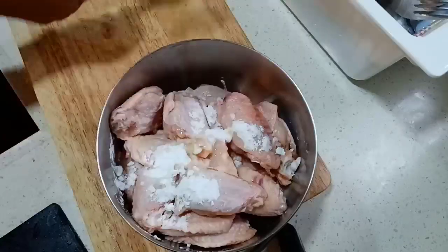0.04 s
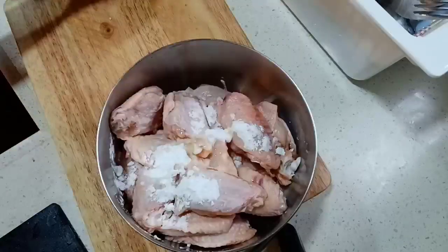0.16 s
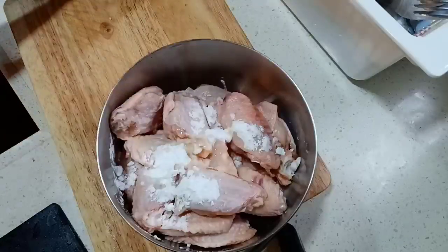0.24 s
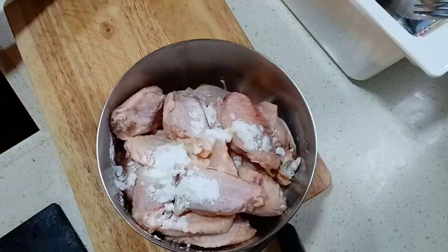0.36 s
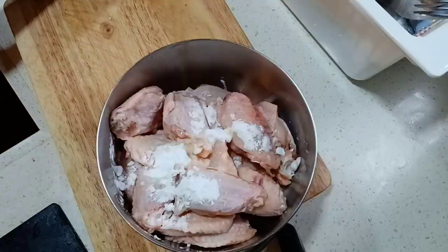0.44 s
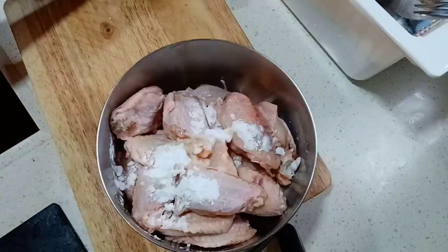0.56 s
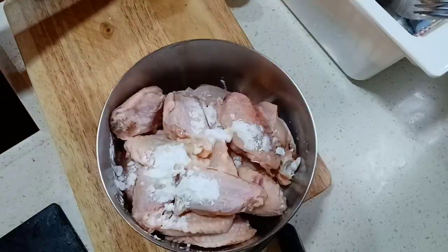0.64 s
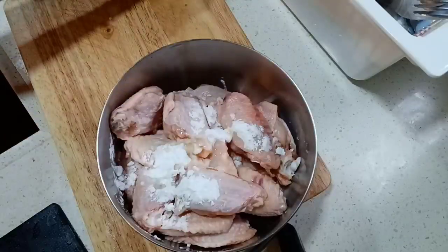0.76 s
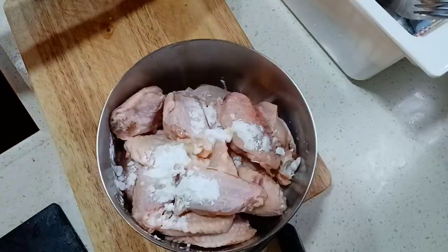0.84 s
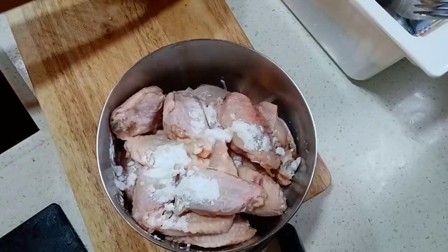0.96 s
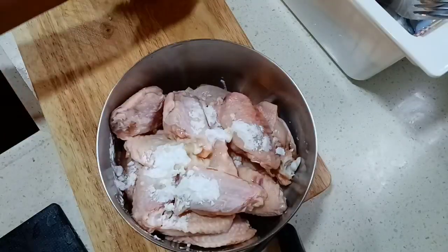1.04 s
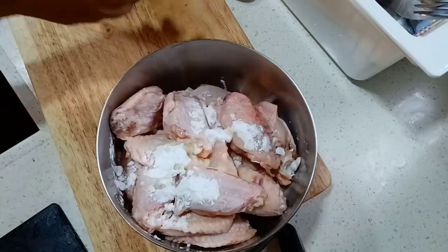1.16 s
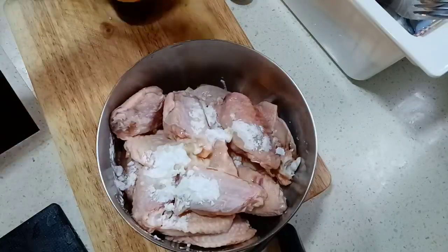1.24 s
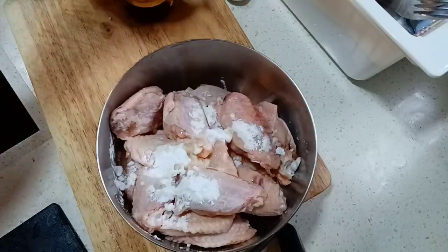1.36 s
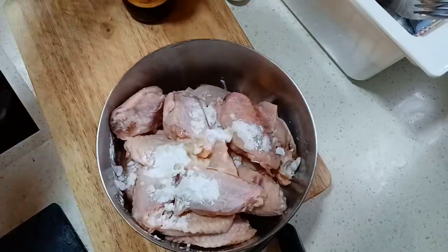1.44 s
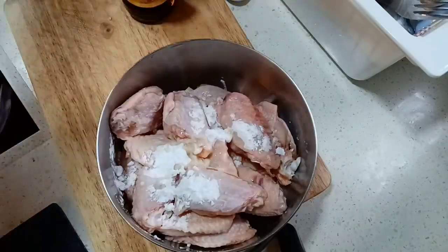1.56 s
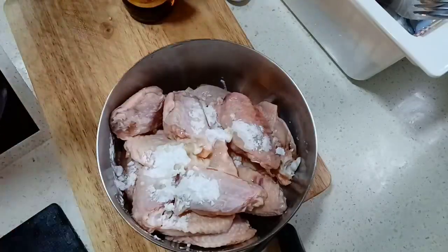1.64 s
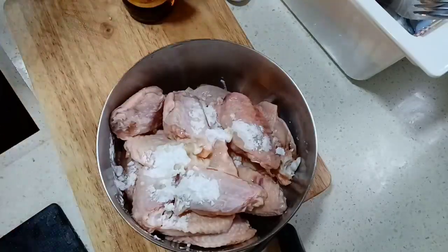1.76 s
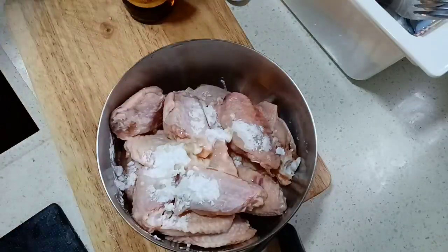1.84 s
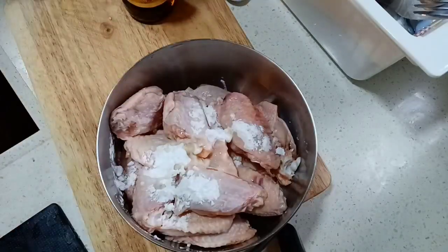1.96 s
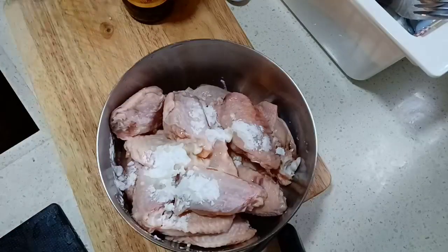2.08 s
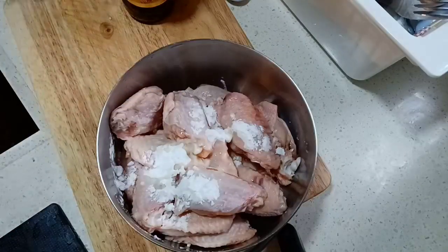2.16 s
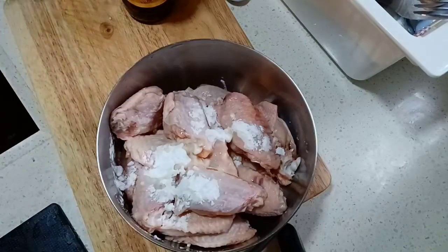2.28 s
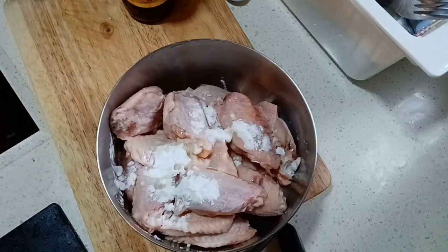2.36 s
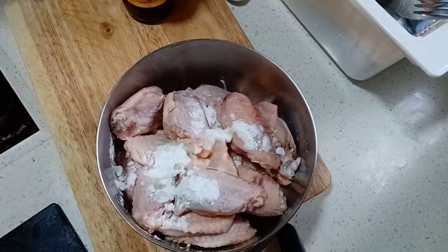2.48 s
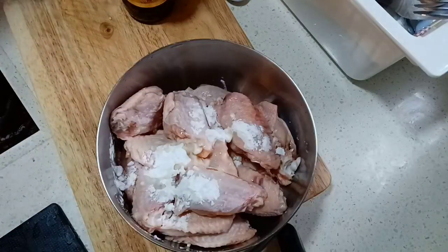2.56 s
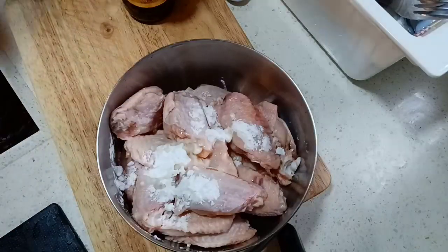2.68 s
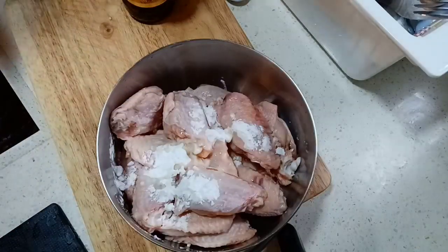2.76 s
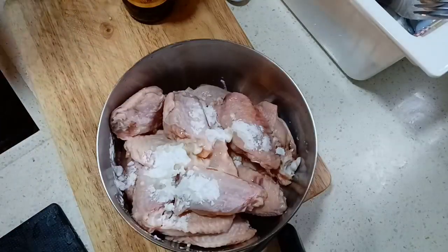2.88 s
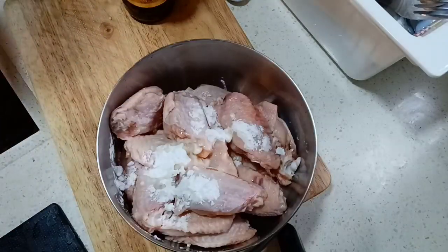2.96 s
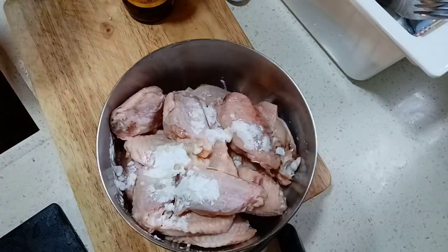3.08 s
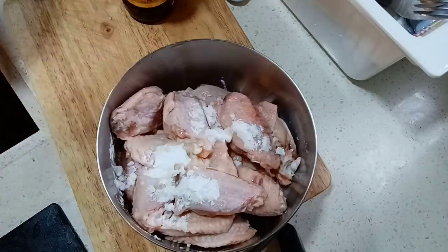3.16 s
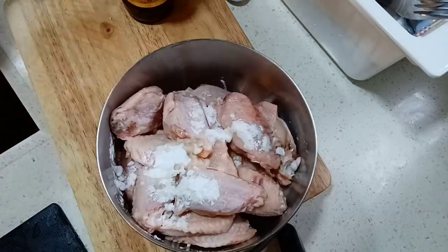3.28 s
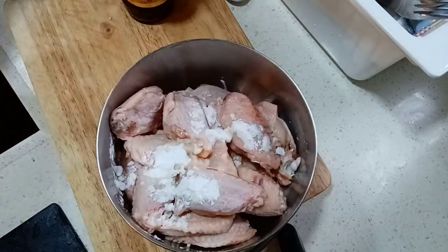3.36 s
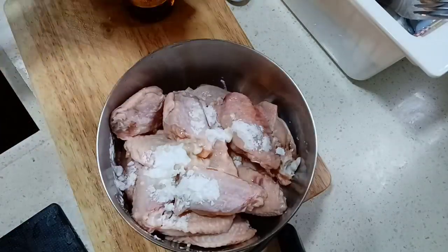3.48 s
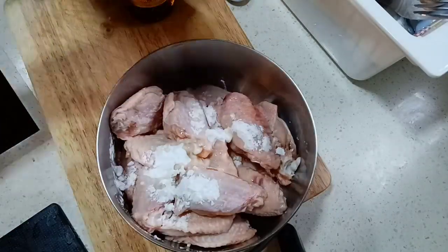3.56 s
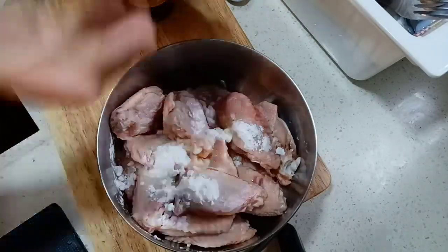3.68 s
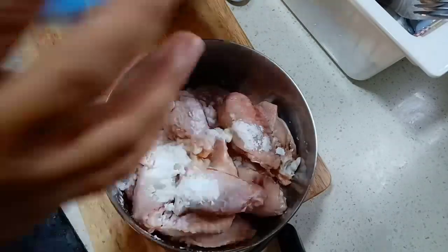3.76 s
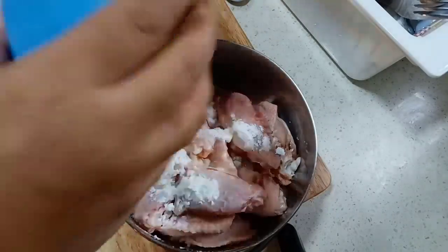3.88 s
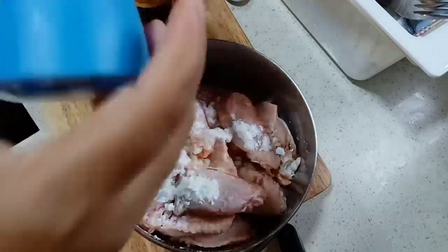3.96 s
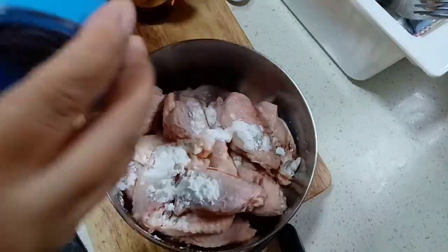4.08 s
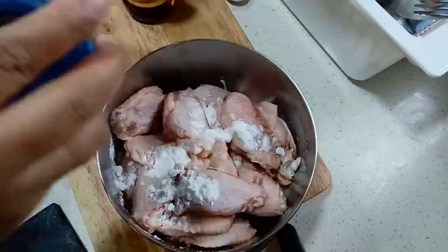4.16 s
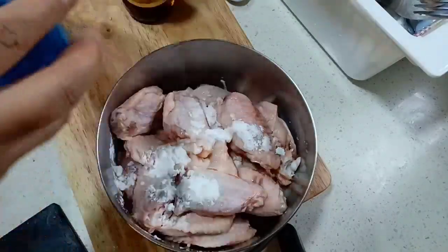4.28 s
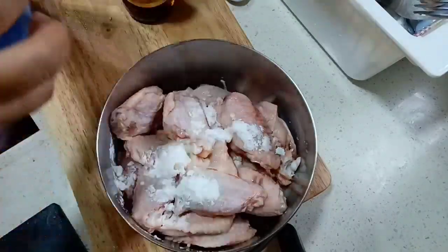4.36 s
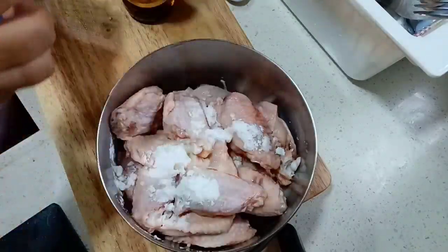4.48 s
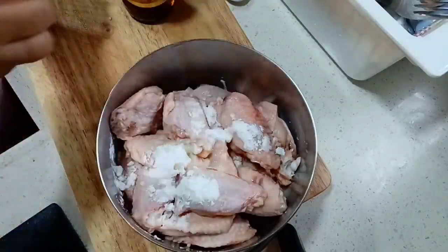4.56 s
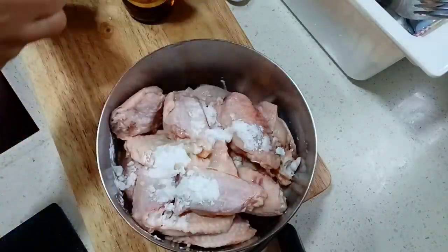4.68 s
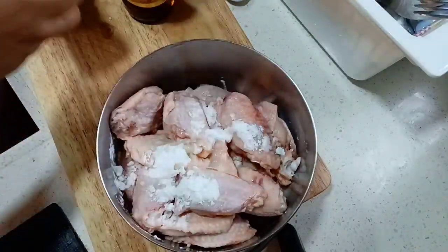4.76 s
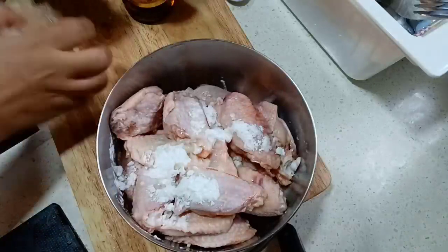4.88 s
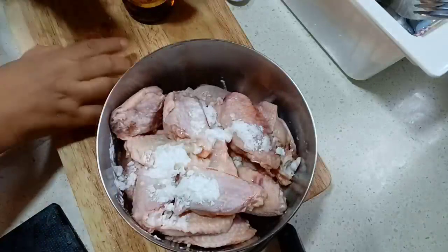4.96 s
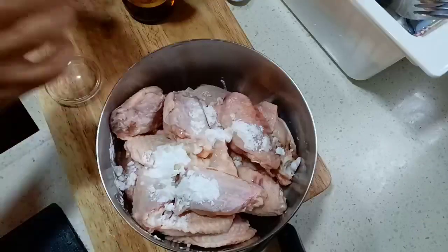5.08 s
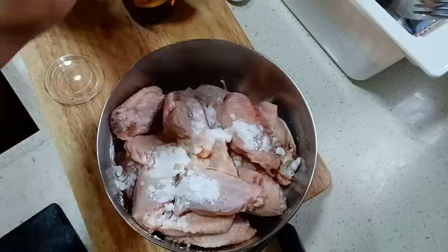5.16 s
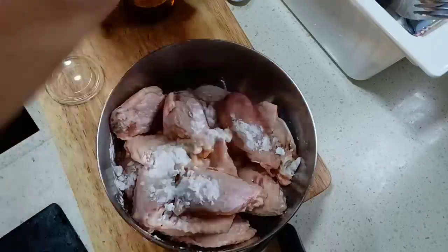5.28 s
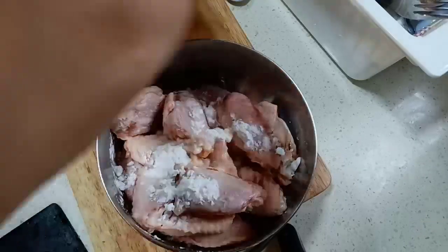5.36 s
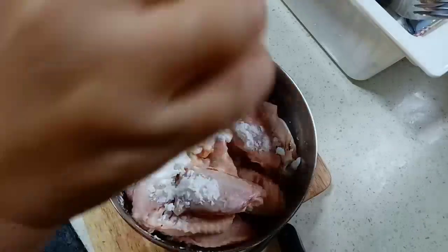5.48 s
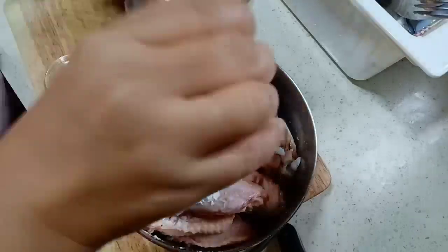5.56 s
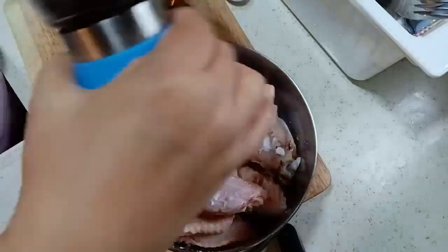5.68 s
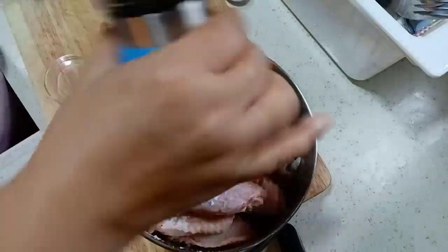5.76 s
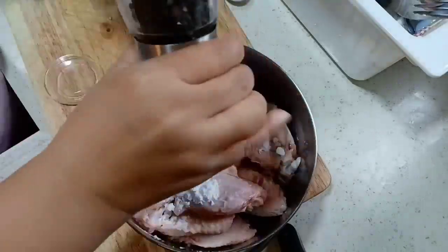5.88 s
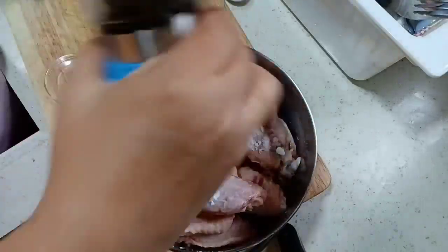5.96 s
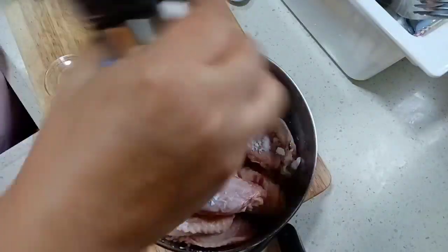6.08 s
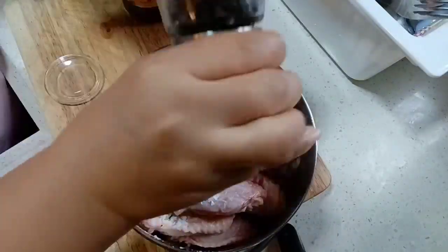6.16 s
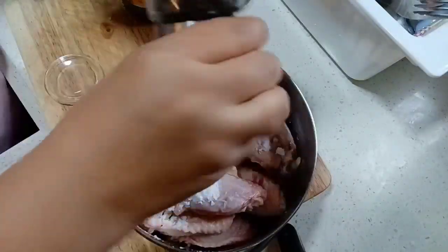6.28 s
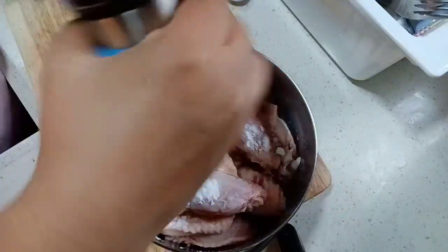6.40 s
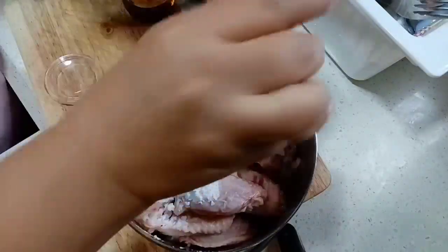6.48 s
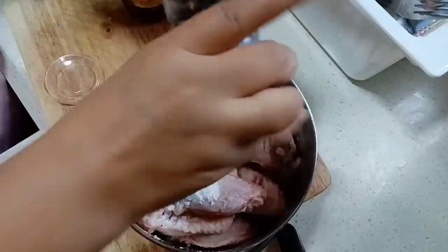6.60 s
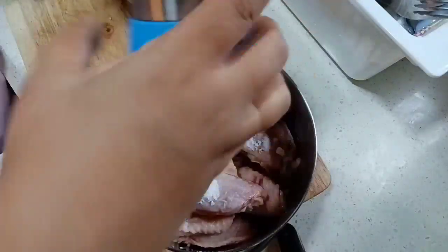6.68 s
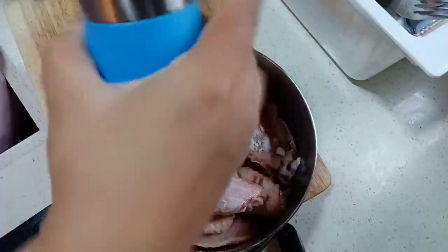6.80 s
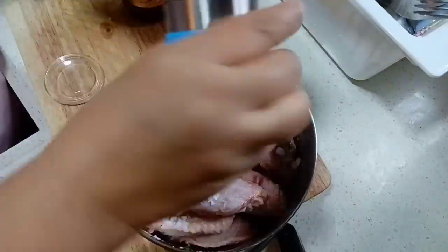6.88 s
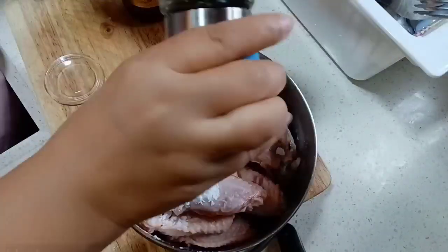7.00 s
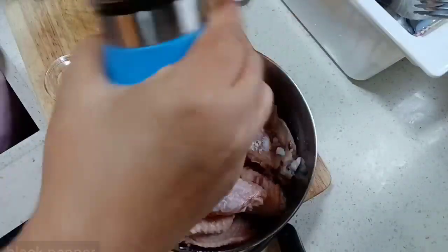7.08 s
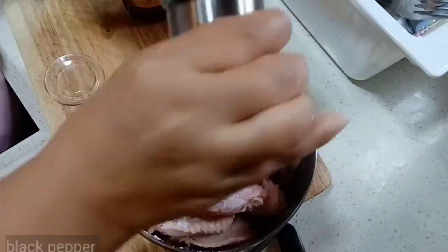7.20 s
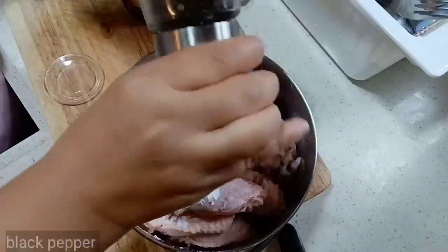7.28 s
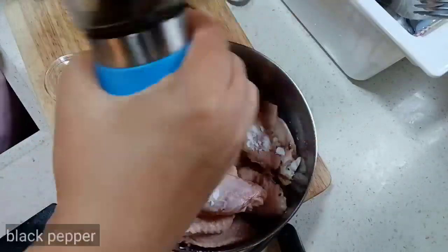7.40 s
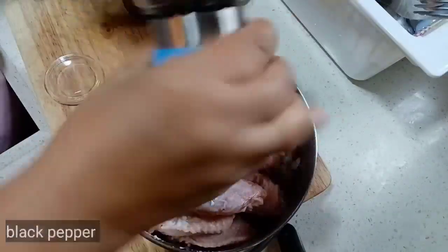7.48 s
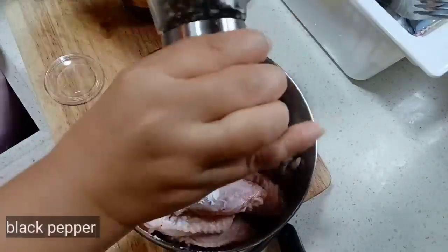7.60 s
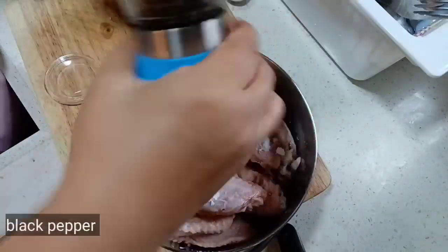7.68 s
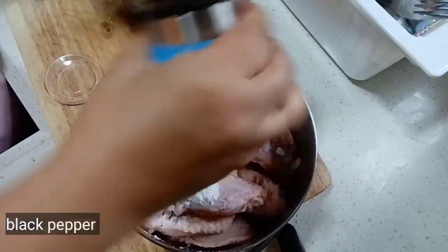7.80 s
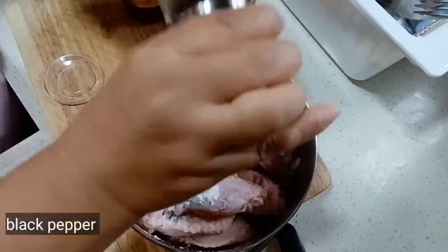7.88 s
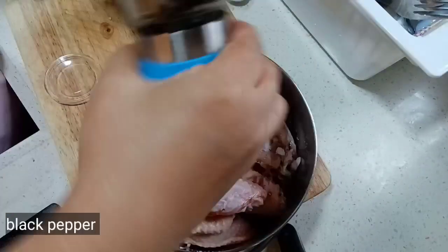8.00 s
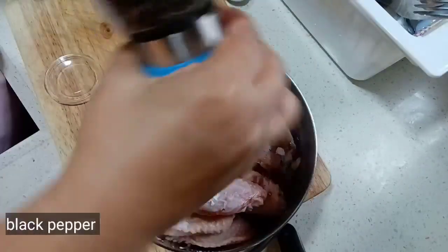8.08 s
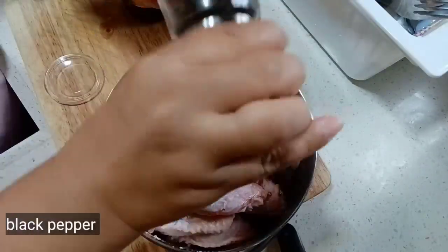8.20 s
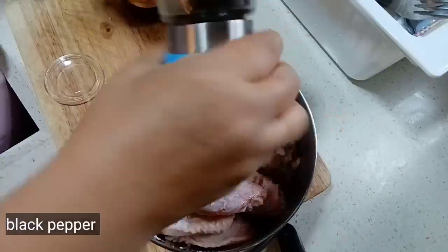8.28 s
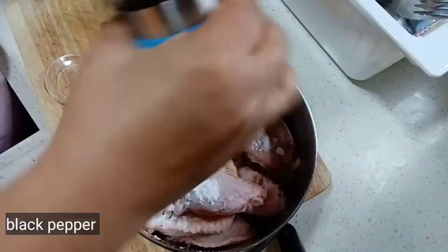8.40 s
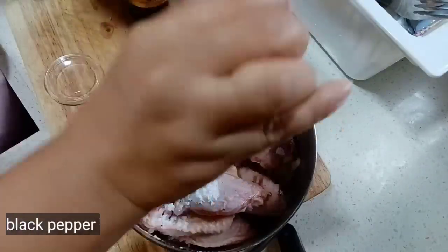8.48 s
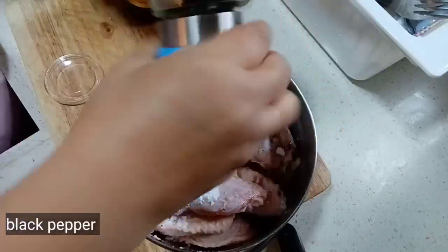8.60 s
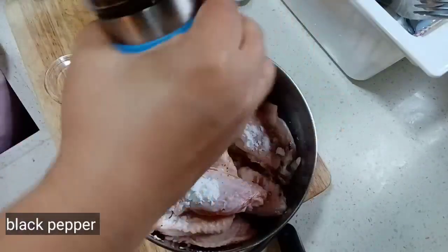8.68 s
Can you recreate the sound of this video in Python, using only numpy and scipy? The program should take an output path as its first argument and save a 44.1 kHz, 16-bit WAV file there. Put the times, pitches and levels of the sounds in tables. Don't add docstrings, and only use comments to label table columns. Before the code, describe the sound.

Close stereo pickup at a kitchen counter, low hum throughout. Scattered handling comes first: spoon tap, bright glass touches, dull bottle landings, a rattling cupboard slam and a woody knock. After a quieter gap, peppercorns shake in a jar, a cap snaps free and clatters down. From about six seconds the mill is twisted about three times a second, each turn a bright rustle with a gritty crunch, ticks and cracks.

```python
import sys
import numpy as np
from scipy import signal
from scipy.fft import rfft, irfft
from scipy.io import wavfile
from scipy.ndimage import uniform_filter1d

SR = 44100
rng = np.random.default_rng(int(sys.argv[2]) if len(sys.argv) > 2 else 0)


def field_ratio(decibels):
    return 10 ** (np.asarray(decibels, dtype=float) / 20)


def store_wav(level_fs):
    pcm = np.round(np.clip(np.atleast_2d(level_fs), -1, 1) * 32767)
    wavfile.write(sys.argv[1], SR, pcm.T.astype(np.int16))


N = 385434
RIGHT_LAG_S = 0.00017


def rms_one(x):
    return x / np.sqrt(np.mean(x ** 2) + 1e-20)


def at_hz(points, hz):
    points = np.array(points)
    return np.interp(np.log(hz), np.log(points[:, 0]), points[:, 1])


def in_time(spans):
    t, rows = np.arange(N) / SR, np.concatenate(spans)
    sounding = sum((t >= span[0][0]) & (t <= span[-1][0]) for span in spans) > 0
    return field_ratio(np.interp(t, *rows.T)) * uniform_filter1d(sounding * 1.0, size=600)


def swells(rows, bed=0):
    t, power = np.arange(N) / SR, np.zeros(N) + bed ** 2
    for start_s, level_db, rise_s, fall_s in rows:
        near = slice(int((start_s - .3) * SR), int((start_s + .3) * SR))
        age = np.abs(t[near] - start_s) / np.where(t[near] < start_s, rise_s, fall_s)
        power[near] += field_ratio(2 * (level_db - 11.5 * age ** 2.72))
    return np.sqrt(power)


def band(x, low_hz, high_hz):
    sos = signal.butter(2, [low_hz, min(high_hz, .45 * SR)], "band", fs=SR, output="sos")
    return signal.sosfilt(sos, x)


def resonate(x, hz, width_hz):
    r = np.exp(-np.pi * width_hz / SR)
    zeros = np.array([1, 0, -1]) * (1 - r * r) / 2
    poles = [1, -2 * r * np.cos(2 * np.pi * hz / SR), r * r]
    return signal.lfilter(zeros, poles, x)


def drift(rate_hz):
    knots = rng.standard_normal(int(N / SR * 200) + 2)
    return np.interp(np.arange(N) / SR * min(rate_hz, 190), np.arange(len(knots)), knots)


def two_mics(mid, side, alike):
    return np.sqrt(1 + alike) * mid + np.sqrt(1 - alike) * side * [[1], [-1]]


def grains(per_s, spread_db, alike):
    sizes = field_ratio(spread_db * np.minimum(rng.exponential(1, (2, N)), 5))
    sizes *= rng.choice([-1, 1], (2, N))
    mid, side = sizes * (rng.random((2, N)) < per_s / SR)
    return two_mics(mid, side, alike)


def strikes(hits, modes, pan_db, low_hz, mid_hz, high_hz, ring_db, crack_db, crack_s, contact_s):
    hz, mode_db, t60 = np.transpose(modes)[:, :, None]
    size = SR // 9
    t = np.arange(max(size, int(1.2 * t60.max() * SR))) / SR
    out = np.zeros((2, N + SR))
    chance = rng.standard_normal((len(hits), len(modes), 3))
    bins = np.fft.rfftfreq(size, 1 / SR) + 1
    pink = np.sqrt(SR / 4 / bins) * np.minimum(bins / low_hz, 1) ** 2
    pink /= 1 + (bins / high_hz / 1.6) ** 3
    cracks = rfft(rng.standard_normal((len(hits), 2, size)))
    cracks *= pink * [np.ones_like(bins), np.minimum(bins / 3000, .55)]
    contact = np.sin(np.pi / 2 * np.minimum(t / contact_s, 1)) ** 2
    for (start_s, peak_db, low_db, high_db), luck, noise in zip(hits, chance, cracks):
        colour = [(low_hz, low_db), (mid_hz, 0), (high_hz, high_db)]
        fade = field_ratio(ring_db + mode_db + at_hz(colour, hz) + 2 * luck[:, :1] - 60 * t / t60)
        crack = irfft(noise * field_ratio(crack_db + at_hz(colour, bins)), size)
        mid, side = crack * np.exp(-t[:size] / crack_s)
        pitch_hz = hz * (1 + .004 * luck[:, 1:2])
        first = round(start_s * SR)
        for mic in range(2):
            skew = np.minimum(hz / 5000, .45) * luck[:, 1 + mic:2 + mic]
            blow = (fade * np.sin(2 * np.pi * pitch_hz * t + skew)).sum(0)
            blow[:size] += mid + side * (-1) ** mic
            out[mic, first:first + len(t)] += field_ratio(peak_db - pan_db * mic) * blow * contact
    return out[:, :N]


# pitch_hz, density_db (per Hz)
HUM = [(15, -88), (25, -68.5), (69, -34), (86, -19.5), (144, -15.5), (169, -16), (198, -7.5), (260, -14),
       (289, -11.5), (359, -1.5), (552, -26), (1240, -29.5), (1750, -38), (3530, -38.5), (15500, -48)]
# pitch_hz, width_hz, level_db
MOTOR = [(101.2, 3.2, -71.5), (144, 38, -69.5), (196.8, 20, -64), (302.5, 24, -71.5), (356, 25, -74.5),
         (390, 17, -80), (850, 290, -83)]
# pitch_hz, likeness (0 to 1)
LIKENESS = [(30, 0.32), (70, 1), (200, 0.88), (500, 1), (1500, 0.053), (8000, 0.055)]


def fridge():
    hum_db, pan_db = -62.5, -3
    hz = np.fft.rfftfreq(N, 1 / SR) + 0.003
    power = field_ratio(2 * at_hz(HUM, hz))
    power *= field_ratio(2 * hum_db - 11.0) / power.sum()
    for centre_hz, width_hz, level_db in MOTOR:
        line = 1 / (1 + (2 * (hz - centre_hz) / width_hz) ** 2) ** 2
        power += field_ratio(2 * level_db) * line / line.sum()
    mid, side = rfft(rng.standard_normal((2, N))) * np.sqrt(power * N / 2)
    sides = two_mics(mid, side, np.clip(at_hz(LIKENESS, hz), 0, 1))
    return irfft(sides, N) * field_ratio([[pan_db / 2], [-pan_db / 2]]) * field_ratio(0.34 * drift(2.3))


# start_s, peak_db, lows_db, highs_db
TAPS = [
    (0.6815, -25.5, 1.5, -31),
    (0.697, -32, 7, -27),
    (0.7495, -46.5, 16, -28.5),
]
# pitch_hz, level_db, t60_s
SPOON = [(800, -4, 0.011), (1150, 2.5, .025), (1790, -8, 0.012), (2930, -1.5, .012), (4300, -6.5, 0.0078)]


def spoon_taps():
    return strikes(TAPS, SPOON, pan_db=-1.5, low_hz=792.6, mid_hz=4170, high_hz=8560,
                   ring_db=-10.5, crack_db=-7, crack_s=0.003, contact_s=0.0004)


# start_s, peak_db, lows_db, highs_db
CLINKS = [
    (0.8554, -20.5, -12.5, 8),
    (0.896, -17.5, -10, -2),
    (1.1022, -26.5, -8.5, -8.5),
    (1.1285, -37, 1, -16.5),
    (1.1391, -30, -13.5, -12.5),
]
# pitch_hz, level_db, t60_s
GLASS = [(3395, -9, .025), (3445, -19, .13), (8040, -12, .04), (8378, 0, .03), (8478, -11, .15),
         (8557, -10, .04), (8850, -10, .05), (14217, -19, .035), (14760, -19, .045), (15000, -16, .025),
         (200, -8, .05), (851, 0, .025), (1100, -3, .015), (1830, -7, .015)]


def glass_clinks():
    glass = strikes(CLINKS, GLASS, pan_db=-3.5, low_hz=990, mid_hz=4945, high_hz=11680,
                    ring_db=2.5, crack_db=-5.5, crack_s=0.0049, contact_s=0.0014)
    glass[1] = np.roll(glass[1], -round(RIGHT_LAG_S * SR))
    return glass


# start_s, peak_db, lows_db, highs_db
LANDINGS = [
    (1.343, -27.5, 6.5, -21),
    (1.372, -43, 21, -31.5),
    (1.488, -27.5, 3.5, -26.5),
    (1.509, -58, -1, -25),
]
# pitch_hz, level_db, t60_s
BOTTLE = [(118, -3, .08), (161, 1, .13), (226, -6, .1), (258, -9, .07), (398, -6, .07), (540, -10, .06),
          (673, -3, .05), (764, -1, .05), (900, -4, .04), (1141, -14, .03)]


def bottle_landings():
    return strikes(LANDINGS, BOTTLE, pan_db=-3, low_hz=150, mid_hz=831, high_hz=3700,
                   ring_db=-4.5, crack_db=-18.5, crack_s=0.014, contact_s=.0008)


# start_s, level_db, length_s, dull_part_db
BRUSHES = [
    (1.492, -64, 0.016, -14),
    (1.843, -73.5, 0.11, 2.5),
    (1.934, -71.5, 0.063, 7),
    (2.681, -76, 0.018, 21.5),
    (3.24, -87, 0.17, 10),
    (3.978, -48.5, 0.069, -33.5),
    (4.222, -61.5, 0.088, -6),
    (4.728, -52.5, 0.034, 5),
    (5.396, -56, 0.14, -4.5),
]


def brushes():
    hiss = grains(per_s=14000.0, spread_db=4.0, alike=0.062)
    bright = swells([(s, db, 0.58 * long, 1.28 * long) for s, db, long, _ in BRUSHES])
    dull = swells([(s, db + dull_db, 0.19 * long, 0.5 * long) for s, db, long, dull_db in BRUSHES])
    return bright * rms_one(band(hiss, 9400, 17000)) + dull * rms_one(band(hiss, 3000, 6300))


# start_s, peak_db, lows_db, highs_db
SET_DOWN = [
    (1.818, -58, -15.5, -0.5),
    (1.825, -50.5, -4, -8),
    (1.885, -55.5, -5.5, -15),
    (1.904, -53, -8.5, -1),
    (2.308, -68, -25.5, 5.5),
    (2.809, -44.5, 1, -24),
    (2.830, -17, -10, -8.5),
    (2.836, -25, 5.5, -26),
    (2.856, -29, 4.5, -6.5),
    (3.349, -56, -28.5, -13),
]
# pitch_hz, level_db, t60_s
BOARD = [(129, -8.5, 0.059), (214, 1.5, 0.067), (319, 1.5, 0.04), (362.8, 3, 0.19), (550, -14.5, 0.015),
         (700, -6, 0.057), (855, -8.5, 0.19), (975, -8, 0.036), (1118, -10.5, 0.05), (1580, -1, 0.027)]


def set_down():
    return strikes(SET_DOWN, BOARD, pan_db=-2.5, low_hz=150, mid_hz=830, high_hz=4270,
                   ring_db=-10.5, crack_db=1.5, crack_s=0.0048, contact_s=0.0009)


# start_s, peak_db, lows_db, highs_db
DOOR = [
    (1.944, -51.5, 9, 2),
    (1.969, -18.5, -16.5, -8),
    (1.982, -24.5, 2.5, -12),
    (2.014, -25, -12, -6),
    (2.021, -32, 12, -28),
    (2.052, -30, 6, -11),
    (2.085, -35, -1.5, -9.5),
    (2.097, -43, 14, -15),
    (2.122, -42.5, 14.5, -10),
]
# pitch_hz, level_db, t60_s
PANEL = [(119.5, -9, 0.046), (167, 3, 0.092), (197.6, -15.5, 0.054), (352.7, -8, .15), (330, -13, 0.074),
         (467, -17, 0.069), (543.4, -16.5, 0.033), (847, -10.5, 0.06), (921, -8, 0.064), (1255, 3, 0.029),
         (1615, 7.5, 0.0211), (1928, 5, 0.014), (2523, 1.5, 0.0098), (3300, 10.5, 0.011)]


def cupboard_door():
    return strikes(DOOR, PANEL, pan_db=-2.5, low_hz=150, mid_hz=808, high_hz=3180,
                   ring_db=0, crack_db=-1.5, crack_s=0.014, contact_s=0.00044)


# start_s, scrape_db
DRAGS = [
    [(2.5, -96), (2.6, -81.5), (2.645, -82), (2.66, -58.5), (2.69, -53), (2.72, -84), (2.8, -110)],
    [(4.17, -82), (4.192, -72), (4.36, -89)],
]


def drags():
    slips = grains(per_s=4200.0, spread_db=3.5, alike=0.14)
    scrape = band(slips, 600, 2000) + field_ratio(-19.0) * resonate(slips, 1290, 400)
    scrape += field_ratio(-31.0) * band(slips, 1800, 9000)
    return in_time(DRAGS) * field_ratio(9.5) * rms_one(scrape)


# start_s, level_db, length_s, pitch_hz
RUBS = [
    (2.9, -75, 0.051, 3600),
    (3.18, -85.5, .03, 5700),
    (3.99, -59, 0.061, 4770),
    (4.21, -65, 0.023, 3360),
    (5.6, -62, .028, 3650),
    (3.6, -70, .08, 12000),
]


def rubs():
    hiss, out = grains(per_s=9000.0, spread_db=2.5, alike=0.19), 0
    for start_s, level_db, length_s, hz in RUBS:
        creak = resonate(resonate(hiss, hz, 0.26 * hz), hz, 0.34 * hz)
        out = out + swells([(start_s, level_db, length_s, length_s)]) * rms_one(creak)
    return out


# start_s, slosh_db, bite_db, length_s
SHAKES = [(3.237, -79.5, -79, 0.2), (3.412, -63, -99.5, 0.099), (3.603, -57.5, -107, 0.088),
          (3.718, -60, -96, 0.02), (3.889, -62, -101, 0.1), (4.016, -85.5, -70.5, 0.052),
          (4.201, -78, -66.5, 0.028), (5.305, -68, -63.5, 0.15), (5.619, -44.5, -49.5, 0.062),
          (5.755, -46.5, -54.5, 0.051), (5.831, -42.5, -61.5, 0.058), (5.924, -45.5, -68.5, 0.033)]
# start_s, start_slosh_db, stop_slosh_db, bite_db, stop_bite_db
TWISTS = [
    (6.226, -39.5, -38.5, -38.5, -51),
    (6.566, -39, -39, -38, -46.5),
    (6.959, -45.5, -43, -48, -40.5),
    (7.295, -41.5, -38.5, -43, -82),
    (7.606, -40.5, -41.5, -37, -51.5),
    (7.934, -41, -39.5, -42, -53),
    (8.24, -40, -42.5, -37.5, -67),
    (8.555, -39, -38, -41.5, -55),
]
# start_s, slosh_db, bite_db
REGRIPS = [
    (6.096, -47.5, -55.5),
    (6.438, -55, -46),
    (6.797, -78, -61),
    (7.177, -73, -56.5),
    (7.474, -72, -53.5),
    (7.793, -72, -57.5),
    (8.098, -65, -54),
    (8.392, -85, -57.5),
    (8.693, -69, -57.5),
]


def wrist():
    half_twist_s = 0.043
    slosh_shape, bite_shape, grip_shape = (0.041, 0.035), (0.019, 0.014), (0.028, 0.043)   # rise, fall [s]
    sloshes, bites = [], []
    for start_s, slosh_db, bite_db in REGRIPS:
        sloshes.append((start_s, slosh_db, *grip_shape))
        bites.append((start_s, bite_db, *grip_shape))
    for start_s, slosh_db, bite_db, length_s in SHAKES:
        sloshes.append((start_s, slosh_db, length_s, length_s))
        bites.append((start_s, bite_db, length_s, length_s))
    for middle_s, start_db, stop_db, bite_db, stop_bite_db in TWISTS:
        sloshes.append((middle_s - half_twist_s, start_db, *slosh_shape))
        sloshes.append((middle_s + half_twist_s, stop_db, *slosh_shape))
        bites.append((middle_s, bite_db, *bite_shape))
        bites.append((middle_s + half_twist_s, stop_bite_db, *bite_shape))
    return sloshes, bites


# start_s, trickle_db
HANDLING = [
    [(3.2, -92.5), (3.53, -84), (4.14, -67.5), (4.44, -77.5), (4.66, -98)],
    [(5.2, -60.5), (5.41, -72), (5.78, -70), (5.93, -69.5), (6.3, -62), (7.1, -56.5), (8.0, -55),
     (8.74, -55.5)],
]
# pitch_hz, width_hz, level_db
JAR = [(10200, 500, 7), (11800, 350, 3), (13400, 550, 14)]


def rustle():
    ticks = grains(per_s=6000.0, spread_db=3.3, alike=.3)
    ticks *= field_ratio(2 * drift(70))
    corns = field_ratio(4.5) * band(ticks, 9550, 17000)
    corns += field_ratio(-10.5 + 6.5 * drift(25)) * band(ticks, 2300, 11000)
    for hz, width_hz, level_db in JAR:
        corns += field_ratio(level_db + 2 * drift(38) + 2.4 * drift(5.4)) * resonate(ticks, hz, width_hz)
    sloshes, _ = wrist()
    return swells(sloshes, in_time(HANDLING)) * field_ratio(-4.2) * rms_one(corns)


# pitch_hz, width_hz, level_db
BURRS = [(1070, 340, -5.5), (1944, 160, -8.5), (2295, 190, 6), (2685, 220, 6.5), (3346, 380, -2)]


def grind():
    chips = grains(per_s=1500.0, spread_db=2.8, alike=0.4)
    chips *= field_ratio(3.5 * drift(70))
    body = field_ratio(-8.5 + 1.5 * drift(20)) * band(chips, 360, 6000)
    body += field_ratio(-14.0 + 1.1 * drift(29)) * band(chips, 4530, 8400)
    for hz, width_hz, level_db in BURRS:
        body += field_ratio(level_db + 3.6 * drift(8.8)) * resonate(chips, hz, width_hz)
    _, bites = wrist()
    idle = field_ratio(-13) * in_time(HANDLING)
    return swells(bites, idle) * field_ratio(0.5) * rms_one(body)


# start_s, peak_db
PINGS = [
    (3.4346, -45.5),
    (3.5486, -49),
    (3.7135, -57),
    (6.2687, -24),
    (6.28, -28),
    (6.6019, -25),
    (7.232, -27),
    (7.5567, -33),
    (8.4936, -36),
]


def corn_pings():
    wall = [(hz, level_db - 10, .006) for hz, _, level_db in JAR]
    return strikes([(s, db, -25, 0) for s, db in PINGS], wall, pan_db=9, low_hz=3000, mid_hz=9300, high_hz=13000,
                   ring_db=-2, crack_db=-12, crack_s=0.00062, contact_s=0.00024)


# start_s, level_db, pitch_hz, swell_s
THUMPS = [
    (4.199, -34.5, 162.9, 0.0079),
    (4.677, -40, 150, 0.0043),
    (5.586, -34, 164, 0.0092),
    (6.151, -44, 165.5, 0.011),
    (6.409, -36.5, 163.3, 0.01),
    (7.517, -44, 155.5, 0.0089),
    (5.921, -50.5, 700, 0.0023),
    (6.407, -46, 1070, 0.014),
]


def thumps():
    out, t = np.zeros(N), np.arange(SR // 4) / SR
    for start_s, level_db, hz, swell_s in THUMPS:
        age = t / swell_s
        tone = np.sin(2 * np.pi * hz * t) + 0.49 * np.sin(2 * np.pi * hz * .68 * t)
        out[round(start_s * SR):][:len(t)] += field_ratio(level_db) * np.e * age * np.exp(-age) * tone
    return out


# start_s, peak_db, lows_db, highs_db
CAP_OFF = [
    (4.6733, -43, -4.5, -1),
    (4.6834, -28, -11.5, -2),
    (4.6997, -35, -19, -24),
    (4.7721, -32, -22.5, -19),
    (4.787, -32, -16.5, -6.5),
    (4.92, -79.5, 1, 20),
]
# pitch_hz, level_db, t60_s
HELD_CAP = [(520, 0, .05), (620, -3, .04), (2200, -6, .02), (3200, -4, .015), (4150, -6, .02),
            (4280, -6, .025)]


def cap_off():
    return strikes(CAP_OFF, HELD_CAP, pan_db=-2.5, low_hz=770, mid_hz=3480, high_hz=10200,
                   ring_db=5.5, crack_db=-7.0, crack_s=0.011, contact_s=0.0026)


# start_s, peak_db, lows_db, highs_db
CAP_HITS = [
    (5.0534, -23, 2, -32),
    (5.1085, -13.5, -8, -31.5),
    (5.239, -56, 14, -28),
]
# pitch_hz, level_db, t60_s
CAP = [(1044, -8, .02), (1500, -5, .02), (1950, 0, .03), (2218, -1, .03), (3500, -6, .015), (4253, 7, .085),
       (4150, 1, .03), (2750, -5, .02), (6412, 3, .05), (6650, 4, .065), (9450, 1, .03), (12600, 4, .025),
       (14300, 5, .03), (14900, 6, .02)]


def cap_drop():
    return strikes(CAP_HITS, CAP, pan_db=0.5, low_hz=1010, mid_hz=3680, high_hz=11200,
                   ring_db=-4, crack_db=-16, crack_s=.004, contact_s=.0004)


# start_s, peak_db
TICKS = [(5.298, -64), (5.539, -55), (5.7096, -49), (5.737, -38.5), (6.0684, -44.5), (6.2274, -31.5),
         (6.2452, -32), (6.385, -47), (6.438, -33.5), (6.7776, -61), (6.9413, -50), (7.1119, -66),
         (7.1478, -55), (7.188, -45), (7.4486, -45.5), (7.7732, -98), (7.7896, -50), (7.9036, -46),
         (8.07, -44), (8.364, -41.5), (8.4133, -48), (8.4368, -39.5), (8.586, -35.5), (8.6683, -47.5),
         (8.6883, -49)]
# pitch_hz, level_db, t60_s
SEAT = [(1800, -16, 0.0086), (2400, 8.5, 0.068), (2800, -18, 0.016), (3420, -16, 0.011)]


def burr_ticks():
    return strikes([(s, db, -12, -14) for s, db in TICKS], SEAT, pan_db=-2, low_hz=1200, mid_hz=2520, high_hz=7000,
                   ring_db=-13, crack_db=-4.5, crack_s=0.0077, contact_s=0.0011)


# start_s, peak_db, highs_db
CRACKS = [(5.57, -46, -40), (5.6032, -59, -15.5), (6.0846, -45, 2), (6.2134, -42, -24), (6.31, -51, 0),
          (6.4293, -40, -47), (6.5484, -43.5, 11.5), (6.56, -33, -50), (6.601, -42.5, 7),
          (6.9187, -43, -24), (6.961, -39.5, -42), (6.9931, -30.5, -7.5), (7.165, -51, -7),
          (7.234, -68, -8), (7.261, -45.5, 2.5), (7.291, -37, -26), (7.4638, -40.5, 2.5),
          (7.5928, -37, -0.5), (7.6073, -22.5, -16), (7.9208, -39.5, -53.5), (7.9469, -32, -25),
          (8.083, -54, 7), (8.2287, -37, 16.5), (8.2454, -34, 8), (8.5454, -48.5, 16.5), (8.5499, -32, -48)]
# pitch_hz, level_db, t60_s
MILL = [(840, 9.5, 0.038), (1070, 2, 0.03), (1236, 20, 0.0085), (1873, 3.5, 0.036), (2258, 8, 0.022),
        (2838, -5, 0.035), (3160, 3.5, 0.031), (3537, 14, 0.01), (5570, -31, 0.046), (7250, -2, 0.0075)]


def corn_cracks():
    hits = [(s, db, -17.5, high_db) for s, db, high_db in CRACKS]
    return strikes(hits, MILL, pan_db=4.5, low_hz=1016, mid_hz=2490, high_hz=6240,
                   ring_db=0, crack_db=0.0, crack_s=0.004, contact_s=0.0004)


# pitch_hz, t60_s
KITCHEN = [(100, 0.19), (500, 0.2), (2000, 0.18), (6000, 0.18), (15000, 0.18)]


def kitchen(x):
    t, tail = np.arange(SR // 2) / SR, 0
    mid, side = rng.standard_normal((2, len(t)))
    for hz in 70 * 2 ** np.arange(0, 8, .5):
        pair = two_mics(mid, side, 1 / (1 + (hz / 1600) ** 2))
        tail = tail + band(pair, hz, hz * np.sqrt(2)) * field_ratio(-60 * t / at_hz(KITCHEN, hz))
    tail *= np.clip((t - .003) / 0.0012, 0, 1)
    return signal.fftconvolve(x, tail / np.sqrt(np.sum(tail ** 2) / 2), axes=1)[:, :N]


def scene():
    far = spoon_taps() + set_down() + cupboard_door()
    glass = glass_clinks()
    near = bottle_landings() + drags() + grind() + corn_pings() + thumps()
    near += cap_off() + cap_drop() + burr_ticks() + corn_cracks()
    room = kitchen(field_ratio(-6) * near + field_ratio(-2) * glass + field_ratio(-1) * far)
    no_deep_bass = signal.butter(6, 102, "high", fs=SR, output="sos")
    contacts = signal.sosfilt(no_deep_bass, near + far + glass + room)
    return fridge() + contacts + brushes() + rubs() + rustle()


def low_pass(x):
    return signal.sosfilt(signal.butter(12, 16500, fs=SR, output="sos"), x)


def record(dry):
    knee_db, slope, recover_db_per_s = -18, 0.13, 6.5
    t = np.arange(N) / SR
    level_db = 10 * np.log10(uniform_filter1d(np.mean(dry ** 2, 0), size=800) + 1e-12)
    wanted_db = np.maximum(level_db - knee_db, 0) * slope
    recovery_db = recover_db_per_s * t
    held_db = np.maximum.accumulate(wanted_db + recovery_db) - recovery_db
    slow = np.exp(-1 / (0.12 * SR))
    gain = field_ratio(-signal.lfilter([1 - slow], [1, -slow], held_db))
    right = np.roll(dry[1], round(RIGHT_LAG_S * SR))
    treble_edge = signal.cheby2(12, 60, 16200, fs=SR, output="sos")
    return low_pass(signal.sosfilt(treble_edge, gain * [dry[0], right]))


dry = scene()
out = record(dry)
store_wav(out)
```